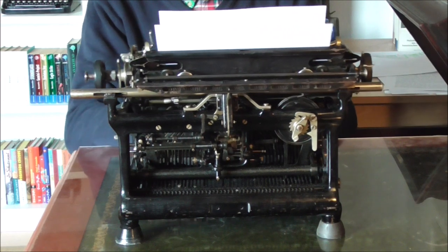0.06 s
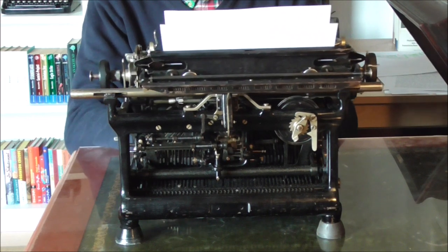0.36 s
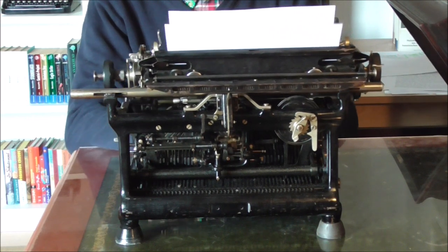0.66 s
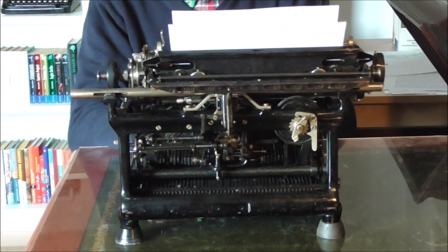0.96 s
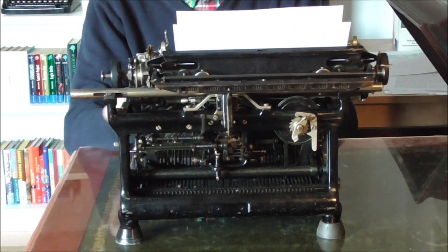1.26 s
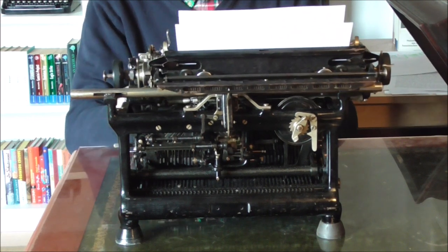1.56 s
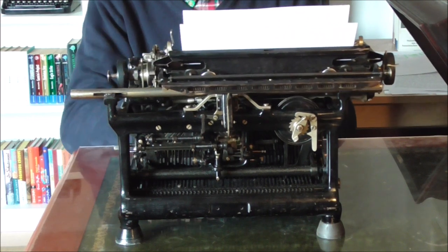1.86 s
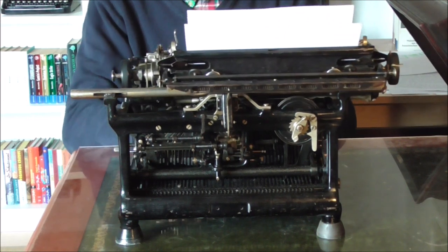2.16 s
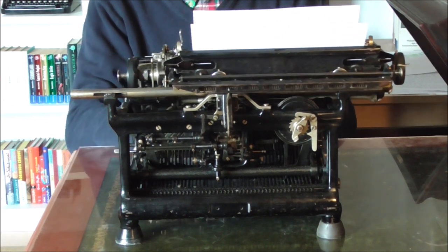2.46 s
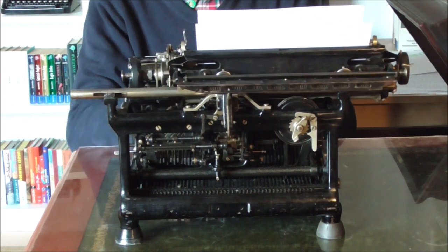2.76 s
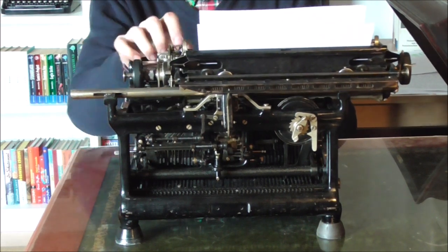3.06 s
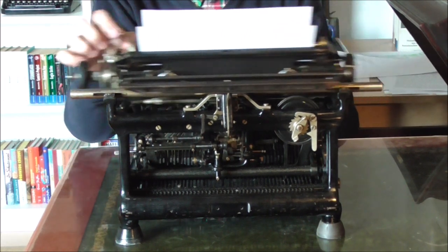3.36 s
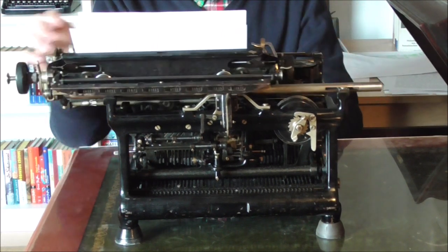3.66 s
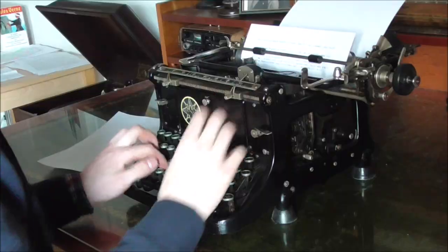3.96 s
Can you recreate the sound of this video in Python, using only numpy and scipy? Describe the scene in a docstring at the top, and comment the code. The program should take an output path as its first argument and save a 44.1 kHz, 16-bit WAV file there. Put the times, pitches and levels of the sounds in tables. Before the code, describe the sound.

A manual typewriter clacks unevenly, then its bell dings and the carriage ratchets back.

```python
"""Sharp cracks of a manual typewriter, close by in a quiet room. Each typebar hits the platen and sets the
frame ringing; between letters the carriage steps on with a soft thump, among small clicks and dull knocks.
The margin bell rings, the carriage is pushed back over its ratchet, the bell rings again and the carriage
slams into its stop. One more letter, and the sound cuts off."""
import sys
import numpy as np
from scipy import signal
from scipy.fft import rfft, irfft
from scipy.io import wavfile
from scipy.ndimage import uniform_filter1d

SR = 44100
rng = np.random.default_rng(int(sys.argv[2]) if len(sys.argv) > 2 else 0)


def digitize_waveform(pressure):
    """Quantize a signal to 16-bit integers and store it at the path in sys.argv[1].

    Rows of a 2-D input are taken as channels; values are limited to [-1, 1].
    """
    field = np.atleast_2d(pressure).T
    bounded = np.clip(field, -1, 1)
    quanta = np.round(bounded * 32767).astype(np.int16)
    wavfile.write(sys.argv[1], SR, quanta)


N = 176400
T = np.arange(SR // 2) / SR  # half a second, the time axis of one hit
DESK_RISE_S, KNOCK_RISE_S = 0.02173, 0.0036

# bright crack of metal on a hard contact: frequency_hz, level_db
CRACK_SPECTRUM = [(100, 7), (450, -5.5), (1750, -8), (2300, 5), (2900, -5.5), (4700, 7.5), (6400, -2.5),
                  (10300, 6.5), (15500, -3)]
# the frame and the resting bars ringing together: frequency_hz, level_db
FRAME_SPECTRUM = [(150, -3), (420, -8), (550, -0.5), (660, -8.5), (1000, -3), (1330, 1), (1750, -10),
                  (2250, -5), (2800, -8.5), (4500, 2.5), (6200, -3), (8000, 0), (13500, -9.5), (15500, -32)]
# the carriage hits its stop and the machine rocks: start_s, crash_db, chassis_db, thump_db
STOP_HITS = [(3.707, -31.5, -36.5, -35), (3.73, -48, -32.5, -39), (3.772, -35.5, -60, -28.5)]


def amp(db):
    """Decibels to gain."""
    return 10 ** (np.asarray(db) / 20)


def unit(x):
    """Scales to rms 1."""
    return x / np.sqrt(np.mean(x ** 2) + 1e-20)


def read(points, hz):
    """Reads a table on a log-frequency axis."""
    f, value = np.transpose(points)
    return np.interp(np.log(hz + 1), np.log(f), value)


def add(mix, start_s, sound):
    """Mixes a sound in at a time, which may lie before the start."""
    at = round(start_s * SR)
    sound = sound[..., max(-at, 0):]
    part = mix[:, max(at, 0):][:, :sound.shape[-1]]
    part += sound[..., :part.shape[1]]


def fade(t60, t=T):
    """Exponential decay, 60 dB down after t60 seconds."""
    return np.exp(-np.log(1000) * t / t60)


def attack(rise_s, t=T):
    """Linear fade-in."""
    return np.minimum(t / rise_s, 1)


def equalise(x, curve):
    """Filters by a curve of frequency_hz, gain_db."""
    hz = np.fft.rfftfreq(x.shape[-1], 1 / SR)
    return irfft(rfft(x) * amp(read(curve, hz)), x.shape[-1])


def noise(spectrum, size=len(T)):
    """Coloured stereo noise, widest in the treble."""
    # stereo width: frequency_hz, side_db
    width = [(90, -12), (450, -8), (4500, -9), (8000, -1.5), (13000, -6.5)]
    mid, side = equalise(rng.standard_normal((2, size)), spectrum)
    side = equalise(side, width)
    return unit(np.array([mid + side, mid - side]))


def ring(modes, detune, spread, sign=1):
    """Dying modes that vary by hit and by ear; a negative sign sets neighbours in opposite phase."""
    out = np.zeros((2, len(T)))
    for k, (hz, db, t60) in enumerate(modes):
        pitch_draw, phase_draw, level_draw = rng.standard_normal(3)
        ear_phase = spread * phase_draw * np.array([[1], [-1]])
        phase = 2 * np.pi * hz * (1 + detune * pitch_draw) * T + ear_phase
        out += sign ** k * amp(db + level_draw / 2) * fade(t60) * np.sin(phase)
    return out


def rattle(size=len(T), depth_db=2):
    """The lumpy level of loose parts chattering."""
    wobble = unit(uniform_filter1d(rng.standard_normal(size), size=110))
    return unit(amp(depth_db * wobble))


def desk_thump():
    """A soft push rocks the machine on the desk."""
    # low modes of machine and desk: pitch_hz, level_db, t60_s
    desk_modes = [(78, 0, .21), (122, -7, .17), (176, -.5, .24), (205, -8, .16), (272, -10, .2)]
    swell = np.sin(np.pi / 2 * attack(DESK_RISE_S)) ** 2
    return ring(desk_modes, detune=0.027, spread=0.1) * swell * amp([[-1], [1]])


def type_crack(hold_s=0.00093):
    """Type meets platen: a contact of about a millisecond, with the same spectrum at every blow."""
    burst = rfft(noise(CRACK_SPECTRUM) * fade(0.0045, np.maximum(T - hold_s, 0)))
    flat = burst / np.sqrt(np.mean(abs(burst) ** 2, 0))
    shaped = flat * amp(read(CRACK_SPECTRUM, np.fft.rfftfreq(len(T), 1 / SR)))
    return irfft(shaped * np.linalg.norm(burst) / np.linalg.norm(shaped)) * (T < T[-1] / 2)


def frame_wash():
    """The dense ring of the ironwork; the treble dies first."""
    # ring time of the frame: frequency_hz, t60_s
    decay = [(150, 0.59), (4500, 0.37), (8000, 0.31)]
    hz, t, bands = signal.stft(noise(FRAME_SPECTRUM), SR, nperseg=256)
    return signal.istft(bands * fade(read(decay, hz)[:, None], t), SR)[1][:, :len(T)]


def typebars():
    """The linkage rattles as a bar flies up; it cracks on the platen, and bar and frame ring on."""
    # letters typed: start_s, level_db, bar_ring_db
    strikes = [(-.012, -4, 0), (0.0982, -2.5, 3), (0.3382, -0.5, -1.5), (0.4808, -1.5, 0.5),
               (0.6195, -1.5, 1), (0.9198, -1, 0.5), (1.077, -1.5, 2), (1.1933, -1.5, 0.5), (1.5803, 0, 1),
               (1.876, 0.5, -4), (1.9805, -0.5, -1.5), (2.0513, 0, -3), (2.2478, 0, -2.5),
               (2.3403, -2.5, 0), (2.4512, -0.5, -3), (2.7569, 1.5, -4.5), (2.8669, 1, -4),
               (3.905, 3.5, -3.5)]
    # modes of a typebar: pitch_hz, level_db, t60_s
    bar_modes = [(1178, -39.5, 0.052), (4370, -16.5, 0.0081), (4820, -16, 0.0077), (5370, -17, 0.0057),
                 (7560, -32.5, 0.058)]
    # clearest modes of the frame: pitch_hz
    frame_hz = [1085, 1331, 1410, 4019, 4360, 4772, 5194]
    # strength of each frame mode: level_db
    frame_db = [-57.5, -50.5, -55.5, -52.5, -54.5, -49.5, -63]
    # the strikes brighten along the line: time_s, treble_db
    brightness = [(1.6, -0.5), (2.2, 0.5)]
    frame_modes = [(hz, db, 0.37) for hz, db in zip(frame_hz, frame_db)]
    out = np.zeros((2, N))
    for start_s, db, bar_db in strikes:
        pitch = 0.783 if start_s > STOP_HITS[0][0] else 1  # the far end of the platen rings lower
        tuned = [(hz * pitch, level, t60) for hz, level, t60 in bar_modes]
        bar = amp(bar_db) * ring(tuned, detune=0.0057, spread=0.037, sign=-0.88)
        clatter = amp(-29.5) * noise(FRAME_SPECTRUM) * fade(t60=0.07) * rattle()
        tail = amp(-36.5) * frame_wash() * rattle() + ring(frame_modes, detune=.001, spread=.5)
        strike = amp(-21.5) * type_crack() + bar + clatter + tail
        shelf = [(5000, 0), (8000, np.interp(start_s, *np.transpose(brightness)))]
        add(out, start_s, amp(db) * equalise(strike, shelf))
        linkage = noise(FRAME_SPECTRUM) * rattle() * attack(0.0044) * fade(t60=0.44)
        add(out, start_s - .016, amp(db - 45) * linkage)
        add(out, start_s - DESK_RISE_S / 2, amp(db - 48) * desk_thump())
    return out


def room_air():
    """The faint, low hush of the room."""
    # room tone: frequency_hz, level_db
    air_spectrum = [(25, -1), (70, 0), (600, -6.5), (2000, -34)]
    return amp(-65) * noise(air_spectrum, size=N)


def carriage_steps():
    """The carriage steps on after a letter or space and nudges the desk."""
    # steps: start_s, level_db
    steps = [(0.064, -42), (0.194, -41.5), (0.283, -45.5), (0.438, -44), (0.58, -45), (0.731, -42),
             (0.864, -39), (1.001, -42), (1.164, -41.5), (1.299, -42.5), (1.688, -42), (1.806, -38),
             (2.176, -42.5), (2.327, -46), (2.561, -44), (2.691, -45), (2.969, -46)]
    out = np.zeros((2, N))
    for start_s, db in steps:
        add(out, start_s, amp(db - 0.5) * desk_thump())
    return out


def metal_clicks():
    """Bars falling back, levers and latches click and lightly ring the frame."""
    # clicks: start_s, level_db
    clicks = [(.082, -39.5), (0.186, -44), (.469, -41), (0.2186, -46.5), (0.7506, -42.5), (0.874, -50),
              (1.042, -42.5), (1.3306, -44), (1.5361, -44.5), (1.8284, -47), (2.185, -40.5), (2.564, -41.5),
              (2.978, -44), (3.12, -50.5), (3.2648, -45.5), (3.398, -47), (3.7073, -30), (3.8067, -34.5),
              (3.8605, -43.5), (3.8913, -33.5)]
    out = np.zeros((2, N))
    for start_s, db in clicks:
        click = noise(CRACK_SPECTRUM) * fade(t60=.045) + amp(-8) * frame_wash()
        add(out, start_s, amp(db) * click)
    return out


def dull_knocks():
    """Space bar and line lever land with a dull knock."""
    # knocks: start_s, level_db
    knocks = [(0.188, -43.5), (0.752, -43), (1.692, -43), (1.746, -47), (2.603, -42.5), (2.98, -54),
              (3.199, -53), (3.279, -47.5)]
    # boxy body of a knock: frequency_hz, level_db
    body = [(60, -20), (200, 3.5), (280, 4.5), (400, -8.5), (540, 0), (720, -12.5), (1100, -16),
            (5000, -25)]
    out = np.zeros((2, N))
    for start_s, db in knocks:
        add(out, start_s, amp(db) * noise(body) * attack(KNOCK_RISE_S) * fade(t60=0.35))
    return out


def margin_bell():
    """A small struck bell whose top two partials beat."""
    # strokes: start_s, level_db
    dings = [(2.478, 0.0029), (3.452, -0.83)]
    # partials of the bell: pitch_hz
    partial_hz = [2848, 7036, 12324.3, 12348.7]
    # ring of each partial: level_db, t60_s
    partial_ring = [(-66.5, 3.4), (-47, 1.93), (-34.5, 0.65), (-37.5, 0.58)]
    out, t = np.zeros((2, N)), np.arange(N) / SR
    tone = sum(amp(db) * fade(t60, t) * np.sin(2 * np.pi * hz * t)
               for hz, (db, t60) in zip(partial_hz, partial_ring))
    for start_s, db in dings:
        add(out, start_s, amp(db) * tone * attack(0.0018, t))
    return out * amp([[-2.5], [1.5]])  # to the right


def carriage_return(jitter=.03):
    """The rack hums at its tooth rate, the rollers rumble and the pawl ticks over each tooth."""
    # the push: time_s, tooth_rate_hz, hum_db, rumble_db, pawl_db
    push = [(3.26, 94, -81, -53, -54), (3.36, 110, -56, -59, -62), (3.41, 135, -49.5, -54, -59),
            (3.5, 172, -41.5, -50.5, -69), (3.555, 170, -38, -53.5, -52), (3.6, 174, -46, -49.5, -36),
            (3.71, 194, -56, -48, -34.5)]
    # first three harmonics of the rack: level_db
    harmonics = [0, -24, -16]
    # rumble of the rollers: frequency_hz, level_db
    roller_spectrum = [(100, 3.5), (520, -2.5), (1200, -5), (1900, -16.5), (15000, -23.5)]
    # bright tick of the pawl: frequency_hz, level_db
    pawl_spectrum = [(1800, -27), (3400, -4.5), (7000, 0), (12700, 2.5), (15500, -5.5)]
    # ping of the pawl: pitch_hz, level_db, t60_s
    pawl_modes = [(4950, -19, .1), (6676, -10, .13), (12690, -9, .11)]
    t = np.arange(N) / SR
    times, *curves = np.transpose(push)
    rate, hum_db, rumble_db, pawl_db = (np.interp(t, times, curve) for curve in curves)
    rate = rate * (1 + jitter * unit(uniform_filter1d(rng.standard_normal(N), size=600)))
    moving = (t > times[0]) & (t < times[-1])
    teeth = np.cumsum(rate) / SR
    rack = unit(sum(amp(db) * np.sin(2 * np.pi * k * teeth) for k, db in enumerate(harmonics, 1)))
    hum = amp(hum_db) * rack * rattle(size=N) ** .5
    rumble = amp(rumble_db) * noise(roller_spectrum, size=N)
    out = moving * (hum + rumble)
    new_tooth = np.diff(np.floor(teeth), prepend=0) > 0
    for at in np.flatnonzero(moving & new_tooth):
        tick = noise(pawl_spectrum) * (fade(t60=.012) + amp(-15) * fade(t60=.19))
        ping = ring(pawl_modes, detune=.003, spread=.4)
        start_s = at / SR + (rng.random() - .5) / rate[at]  # up to half a tooth early or late
        add(out, start_s, amp(pawl_db[at] + rng.standard_normal()) * (tick + ping))
    return out


def carriage_stop():
    """The heavy carriage crashes into its stop, rings the chassis and shakes the desk."""
    # first metal contact: pitch_hz, level_db, t60_s
    clank = [(3540, -26, 0.018)]
    # body of the crash: frequency_hz, level_db
    crash_spectrum = [(60, 7.5), (330, 2), (560, 6), (740, -2), (1100, 0), (1900, -17.5), (3500, -11),
                      (6000, -23)]
    # modes of the chassis: pitch_hz, level_db, t60_s
    chassis_modes = [(205, -4, .15), (268, 0, .24), (568, -11, .18), (1049, -11, .2)]
    out = np.zeros((2, N))
    add(out, STOP_HITS[0][0], ring(clank, detune=0, spread=0.35))
    for start_s, crash_db, chassis_db, thump_db in STOP_HITS:
        crash = amp(crash_db) * noise(crash_spectrum) * fade(t60=0.38) * rattle()
        chassis = amp(chassis_db) * ring(chassis_modes, detune=0, spread=0.35) * attack(KNOCK_RISE_S)
        add(out, start_s, crash + chassis + amp(thump_db) * desk_thump())
    return out


def scene():
    """The typewriter over faint room air, a touch to the right."""
    typing = typebars() + carriage_steps() + metal_clicks() + dull_knocks()
    line_end = margin_bell() + carriage_return() + carriage_stop()
    return (typing + line_end + room_air()) * amp([[-0.235], [0.235]])


def record(dry):
    """The lowest bass is taken away; the sound cuts off at the end and the top treble is trimmed."""
    low_hz, high_hz, cut_s = 48, 16100, 3.949
    dry = signal.sosfilt(signal.butter(3, low_hz, "highpass", fs=SR, output="sos"), dry)
    cut = fade(0.051, np.maximum(np.arange(N) / SR - cut_s, 0))
    lowpass = signal.firwin(255, high_hz, window=("kaiser", 9), fs=SR)
    return signal.oaconvolve(dry * cut, lowpass[None], "same")


dry = scene()
out = record(dry)
digitize_waveform(out)
```